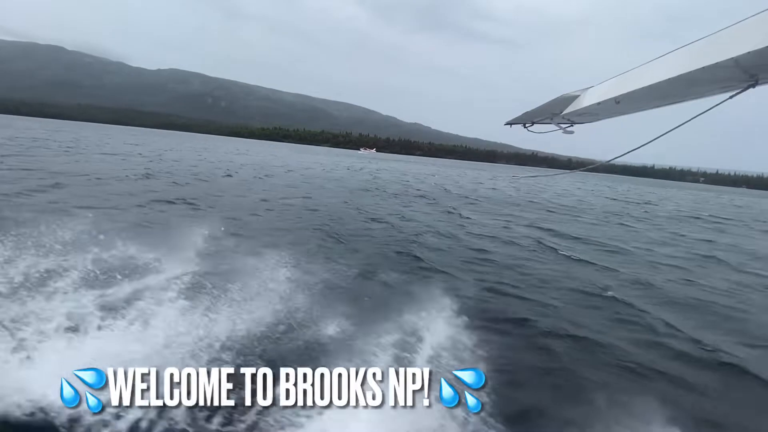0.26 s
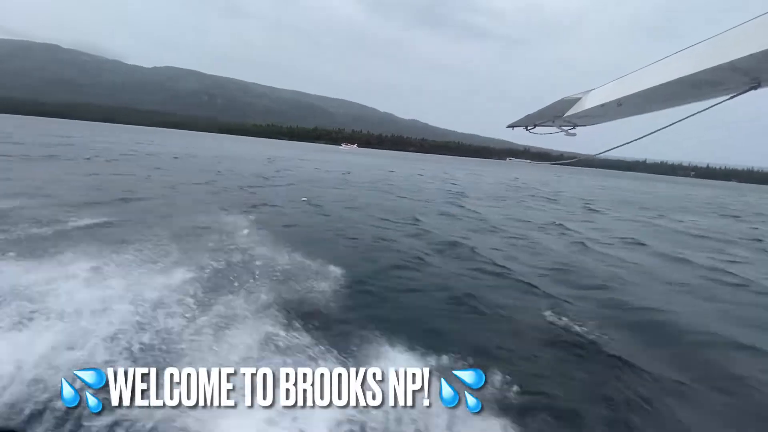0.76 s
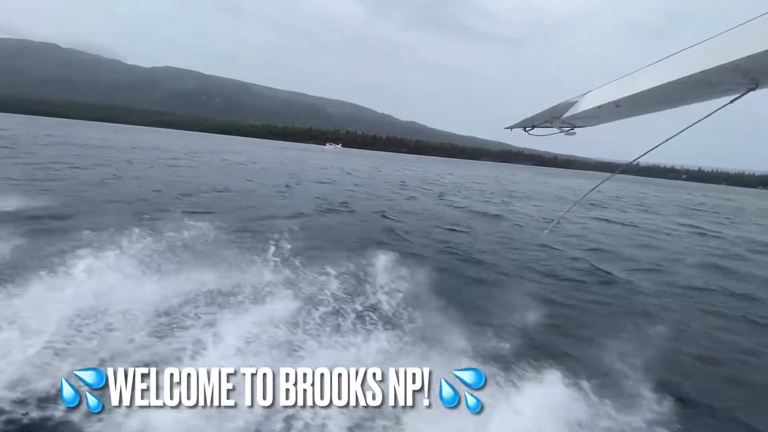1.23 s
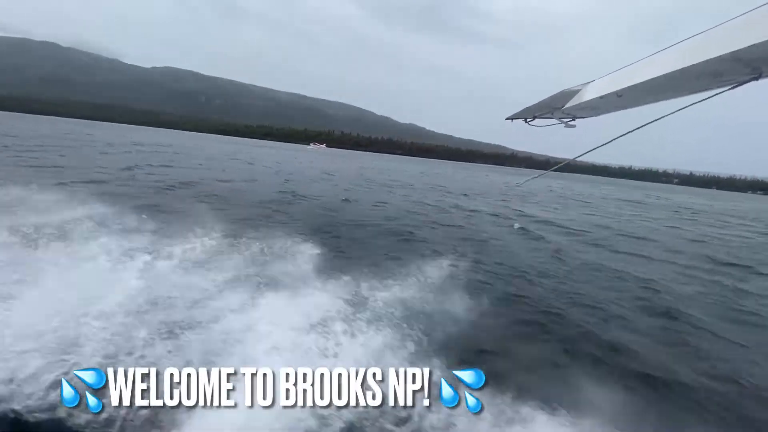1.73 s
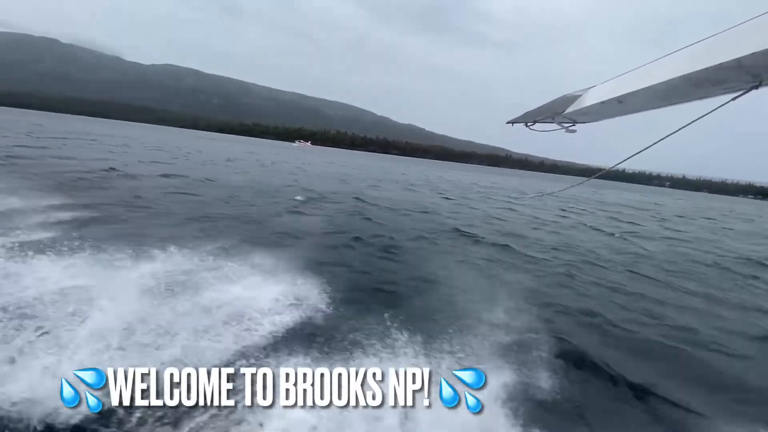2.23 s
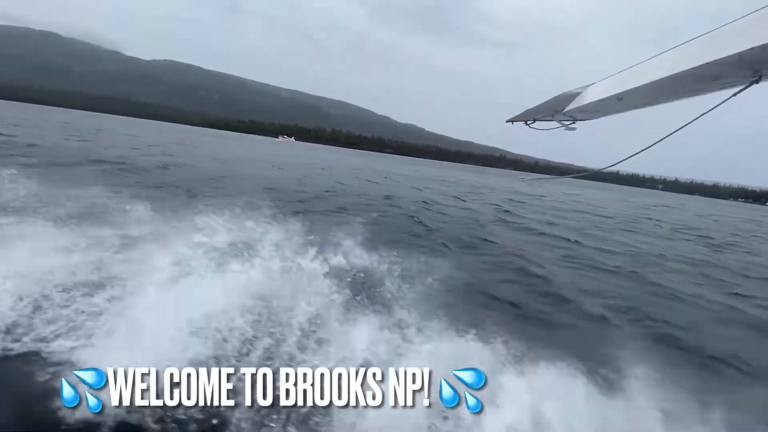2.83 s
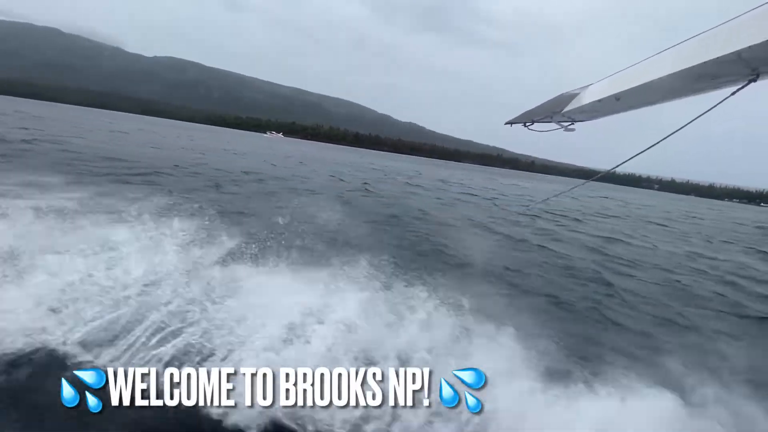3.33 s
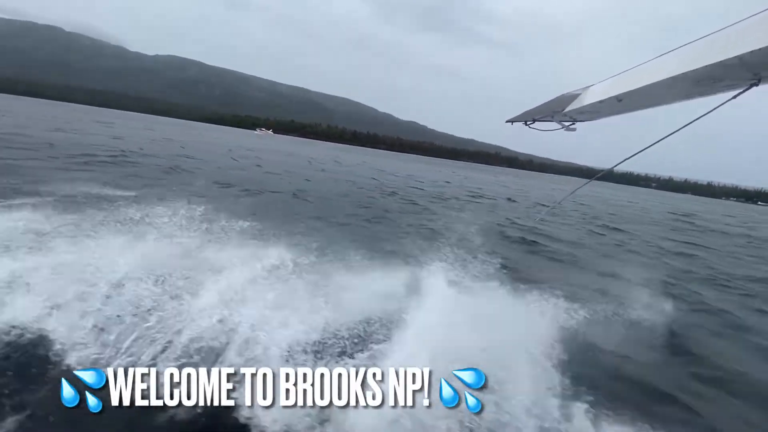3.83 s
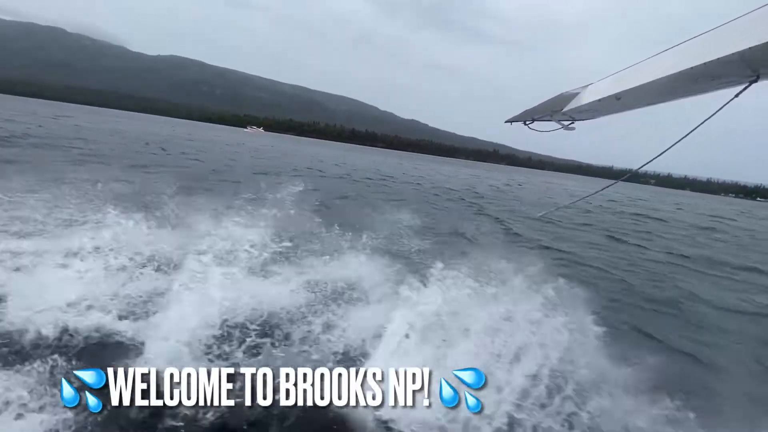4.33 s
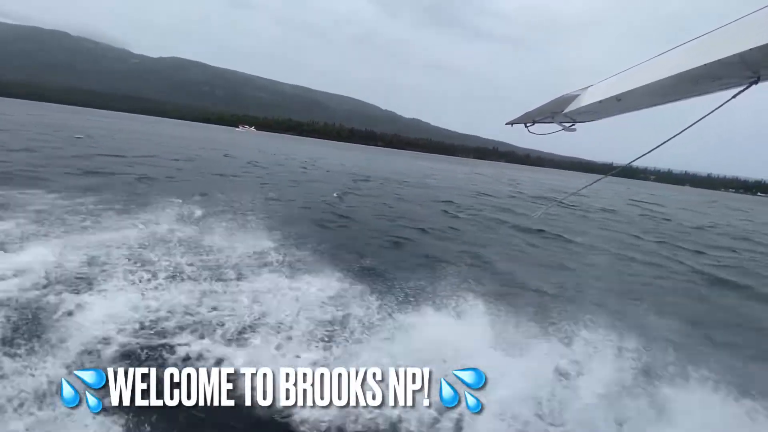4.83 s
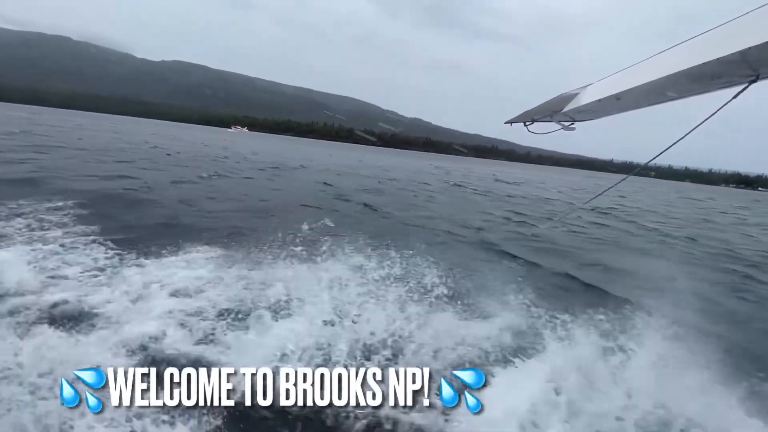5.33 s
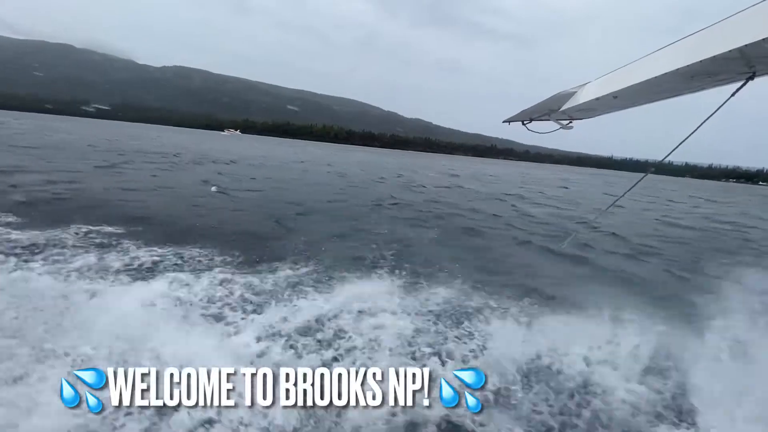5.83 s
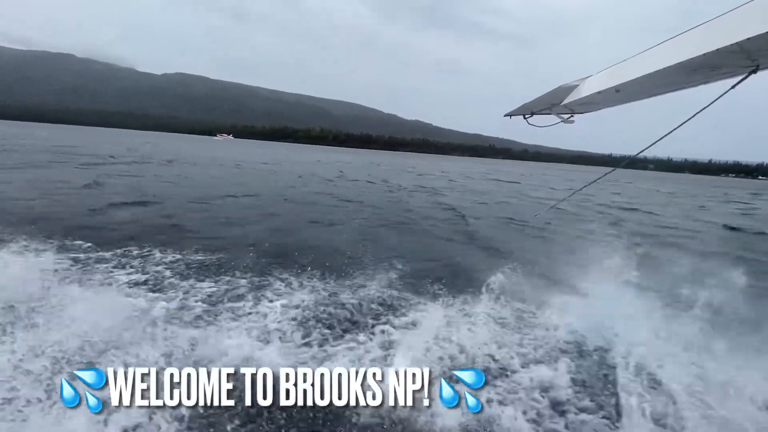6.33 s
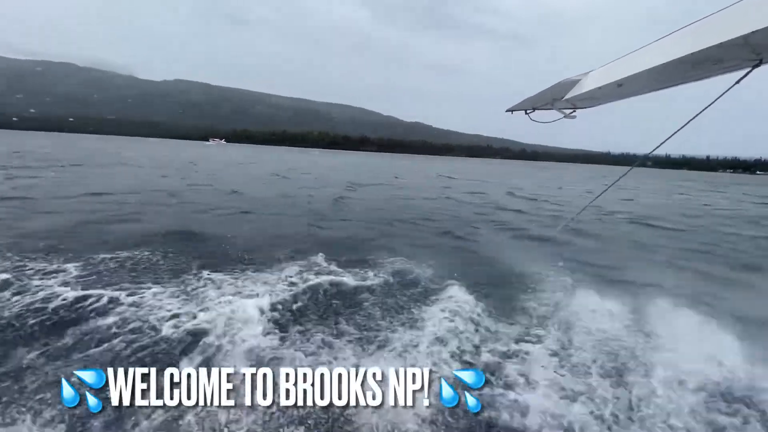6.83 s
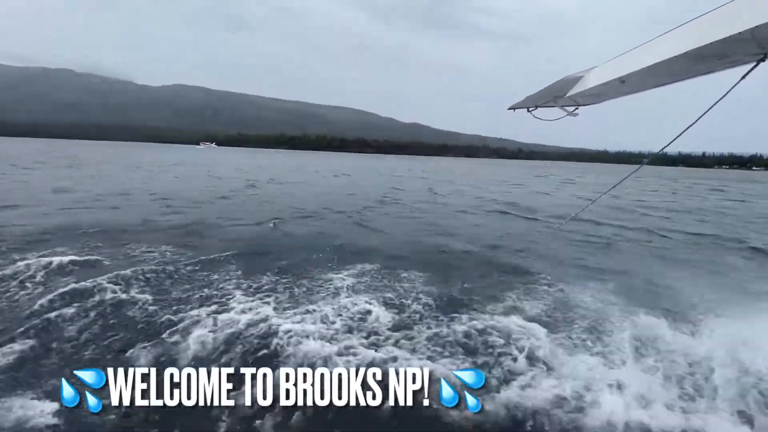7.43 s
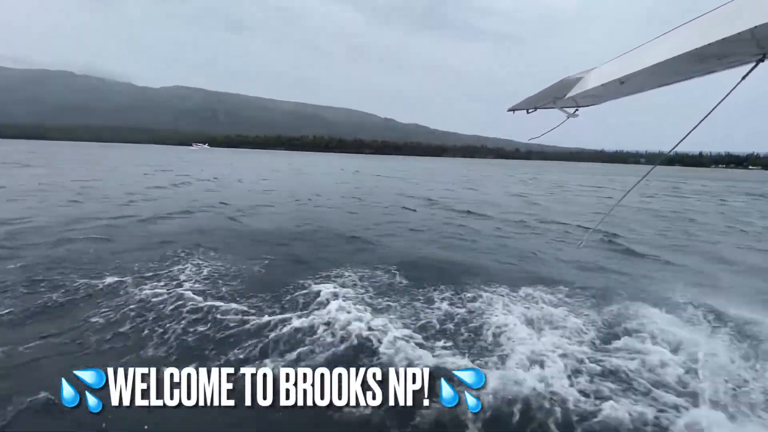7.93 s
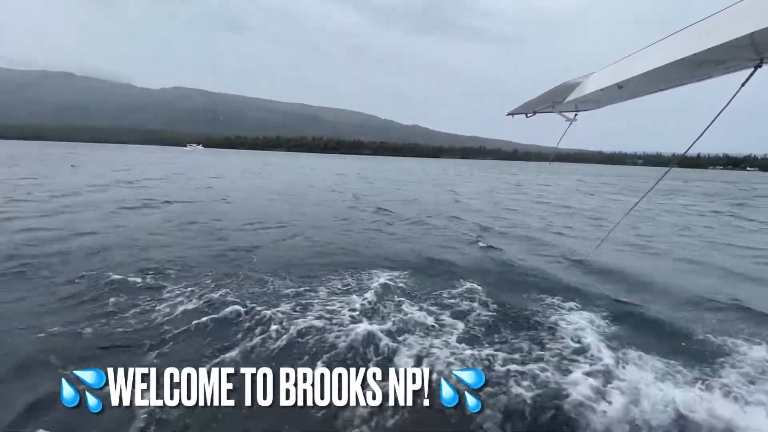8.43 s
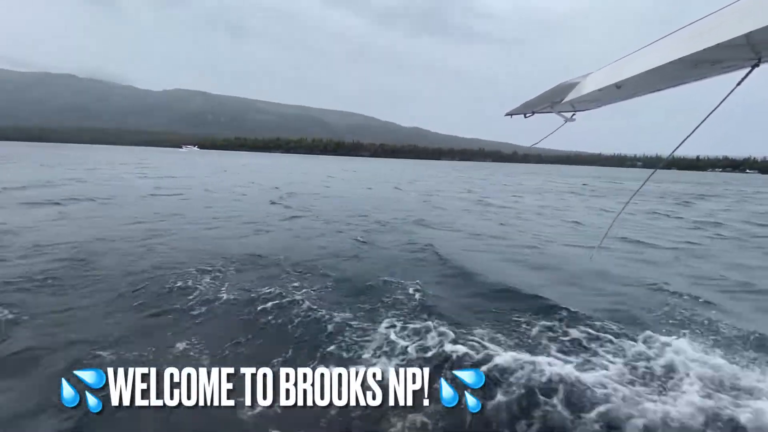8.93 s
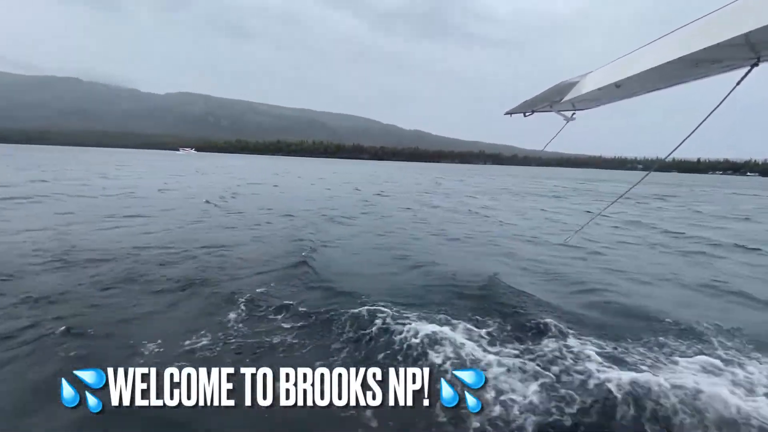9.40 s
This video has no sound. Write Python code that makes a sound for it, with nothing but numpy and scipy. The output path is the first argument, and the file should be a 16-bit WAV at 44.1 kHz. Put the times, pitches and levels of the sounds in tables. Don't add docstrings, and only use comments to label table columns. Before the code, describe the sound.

Inside a floatplane slowing on a lake: low water drumming, thuds on the floats, spray bursts, small squeaks, then engine power swelling back.

```python
import sys
import numpy as np
from scipy import signal
from scipy.fft import rfft, irfft
from scipy.io import wavfile
from scipy.ndimage import uniform_filter1d

SR = 44100
rng = np.random.default_rng(int(sys.argv[2]) if len(sys.argv) > 2 else 0)


def field_ratio(decibels):
    return 10 ** (np.asarray(decibels, dtype=float) / 20)


def unload_audio(sound):
    columns = np.transpose(np.atleast_2d(sound))
    steps = np.round(np.clip(columns, -1, 1) * 32767)
    wavfile.write(sys.argv[1], SR, steps.astype(np.int16))


N = 426006


def unit(x):
    return x / np.sqrt(np.mean(x ** 2) + 1e-20)


def in_time(rows):
    s, *columns = np.transpose(rows)
    return [np.interp(np.arange(N) / SR, s, c) for c in columns]


def at_hz(points, hz):
    axis, *columns = np.transpose(points)
    return [np.interp(np.log(hz), np.log(axis), c) for c in columns]


def drift(rate):
    r = np.exp(-80 * np.pi * rate / SR)
    chance = rng.standard_normal(N // 40 + 2002)
    slow = signal.lfilter([1], [1, -2 * r, r * r], chance)[2000:]
    return np.interp(np.arange(N) / 40, np.arange(len(slow)), unit(slow))


def resonate(x, hz, width_hz):
    r = np.exp(-np.pi * width_hz / SR)
    zeros = np.array([1, 0, -1]) * (1 - r * r) / 2
    return signal.lfilter(zeros, [1, -2 * r * np.cos(2 * np.pi * hz / SR), r * r], x)


def lean(db):
    return field_ratio(np.array([[db / 2], [-db / 2]]))


def banded_noise(spectrum, shared_db, own_db, rate):
    # f/Hz, likeness/0-1, right leads/rad, left over right/dB
    likeness = [(50, 0.96, 0, 0.5), (115, 0.96, -0.17, 2), (203, 0.97, 0.72, 1), (297, 0.59, -0.16, 7),
                (380, 0.56, 1.94, -3), (460, 0.31, 2, -1.5), (717, 0.67, 3.5, -2.5), (960, 0.32, 4, -3),
                (1267, 0.89, 5, -10), (1834, 0.38, 1.5, -8), (2360, 0.3, -1.7, 0.5), (3860, 0.39, 4.5, -2),
                (6040, 0.37, 4.5, -10), (9300, 0, 4.5, 4.5), (11300, 1, 0.5, 1)]
    lowest, highest = spectrum[0][0], spectrum[-1][0]
    edges = np.geomspace(lowest, highest, round(4 * np.log2(highest / lowest)) + 1)
    together, out = drift(rate), 0
    white = rng.standard_normal((2, 3, N))
    white[:, 1] = irfft(1j * rfft(white[:, 0]), N)
    for k, (low, high) in enumerate(zip(edges, edges[1:])):
        middle = np.sqrt(low * high)
        band = signal.butter(2, [low, high], "band", fs=SR, output="sos")
        left, ahead, other = signal.sosfilt(band, white[k % 2])
        alike, lead, lean_db = at_hz(likeness, middle)
        alike = np.clip(alike, 0, 1)
        turned = np.cos(lead) * left + np.sin(lead) * ahead
        right = alike * turned + np.sqrt(1 - alike ** 2) * other
        level_db = at_hz(spectrum, middle)[0]
        gain = field_ratio(level_db + shared_db * together + own_db * drift(2 * rate))
        out = out + gain * lean(lean_db) * [left, right]
    return out / np.sqrt(np.mean(out.mean(axis=0) ** 2))


def blade_note(rows, waver_db, orders=()):
    hz, level_db = in_time(rows)
    t = np.arange(N) / SR
    first, last = rows[0][0], rows[-1][0]
    fade = np.clip((t - first) / 0.17 + 1, 0, 1) * np.clip((last - t) / 0.095 + 3.5, 0, 1)
    turn = 2 * np.pi * np.cumsum(hz) / SR
    note = np.sin(turn) * field_ratio(waver_db * drift(17.4))
    settled = np.clip((t - first - .75) / 0.41, 0, 1)
    for multiple, db in orders:
        strength = settled * field_ratio(db + 3.6 * drift(2.1))
        note += strength * np.sin(multiple * turn + 1.24 * drift(2.5))
    return np.sqrt(2) * fade * field_ratio(level_db) * note


def coasting():
    start_hz, rest_hz, sag_s = 81, 15, 3.3
    hunt_s, hunt_hz, hunt_period_s = 6.68, 2.0, .85
    blade_db, loss_db_per_s = -16.5, 1.0
    dies_s, dies_db_per_s = 2.77, 11.5
    octave_from_s, octave_db, octave_gain_db_per_s = 4.3, -21.5, 2.5
    octave_to_s = 7.05
    s = np.linspace(0, octave_to_s, num=72)
    hunt = (s - hunt_s) / hunt_period_s
    hz = rest_hz + (start_hz - rest_hz) * np.exp(-s / sag_s)
    hz = hz + hunt_hz * np.sin(2 * np.pi * hunt) * (abs(hunt) < .5)
    db = blade_db - loss_db_per_s * s - dies_db_per_s * np.maximum(s - dies_s, 0)
    note = np.transpose([s, hz, db])
    octave = np.transpose([s, 2 * hz, octave_db + octave_gain_db_per_s * (s - octave_from_s)])
    return blade_note(note, waver_db=-1.3) + blade_note(octave[s >= octave_from_s], waver_db=1.0)


def power_return():
    # t/s, f/Hz, level/dB
    climb = [
        (7.42, 36.3, -32),
        (7.47, 38.03, -9.5),
        (7.69, 49.2, -7.5),
        (7.76, 55.15, -8),
        (7.99, 63, -6),
        (8.24, 67.5, -6.5),
        (8.5, 69.74, -8),
        (9.08, 65.45, -9),
        (9.6, 64.7, -8.5),
    ]
    # multiple of blade rate, level/dB
    linked_tones = [(.76, -9), (.89, -12), (1.78, -12.5), (2.35, -25), (3.85, -18)]
    return blade_note(climb, waver_db=1.0, orders=linked_tones)


def cabin_boom(throb):
    # f/Hz, level/dB per Hz
    air_spectrum = [(170, -8), (210, -5), (250, -5), (305, -3), (350, -5), (410, -3.5), (470, -9),
                    (560, -15), (700, -10)]
    # f/Hz, width/Hz, level/dB
    standing = [(157.3, 14.7, -1.5), (210, 16.6, -2.5), (253, 20, -7), (300.3, 23.5, -2), (348.4, 19, -5),
                (414.2, 49, -7.5)]
    broad = banded_noise(air_spectrum, shared_db=1.77, own_db=3.5, rate=9.8)
    white = rng.standard_normal((2, N))
    white[1] = 0.48 * white[0] + 0.83 * white[1]
    modes = 0
    for hz, width, db in standing:
        ring = resonate(resonate(white, hz, width), hz, width)
        modes = modes + field_ratio(db) * ring / np.sqrt(width)
    return (broad + field_ratio(0.7) * unit(modes) * lean(3.6)) * (1 + 0.2 * throb)


def evened(x, share, seconds):
    swell = uniform_filter1d(np.mean(x ** 2, axis=0), round(seconds * SR)) + 1e-6
    return x * swell ** (-share / 2)


def water_drumming():
    # f/Hz, level/dB per Hz
    float_spectrum = [(32, -32), (40, 2), (55, 3), (90, 1), (110, -3.5), (130, -6), (160, -3.5),
                      (178, -5.5), (200, -11.5), (250, -17)]
    rush = banded_noise(float_spectrum, shared_db=1.06, own_db=0.84, rate=5.3)
    return evened(rush, share=1.0, seconds=0.13)


def slaps():
    # t/s, peak/dB, t60/s,
    # wash/dB, upper modes/dB
    waves = [(0.029, -11, 0.25, -29, 3), (0.425, -1.5, 0.26, -30, 0), (1.454, -12, 0.32, -41, -3),
             (1.484, -1, 0.16, -24, -1), (1.859, -5.5, 0.45, -31, 0.5), (2.35, -5, 0.14, -32, 0.5),
             (2.498, -7, 0.29, -43, 5), (3.557, -3.5, 0.23, -33, 1), (4.065, -12, 0.35, -33, -1),
             (4.194, -6, 0.15, -45, 0), (4.68, -16, 0.23, -26, 5), (5.13, -10, 0.35, -42, 3.5),
             (5.607, -10.5, 0.42, -36, 7), (5.73, -12, 0.47, -34, 7.5), (5.945, -9.5, 0.25, -35, 5),
             (7.029, -9, 0.22, -29, -4), (7.34, -5, 0.54, -28, -0.5), (7.47, -11.5, 0.55, -34, 6.5)]
    # f/Hz, level/dB
    shell_modes = [(70, 4), (88, -5.5), (150, -1), (172, -7), (310, -9.5)]
    upper_from_hz = 100
    out, t = np.zeros((2, N + SR)), np.arange(SR // 2) / SR
    white = rng.standard_normal((2, N + SR))
    wash = resonate(white, 580, 400) + 0.44 * resonate(white, 980, 620)
    wash = unit(resonate(wash, 780, 1800))
    chances = rng.standard_normal((len(waves), len(shell_modes)))
    for (s, db, t60, wash_db, upper_db), chance in zip(waves, chances):
        span = slice(round(s * SR), round(s * SR) + len(t))
        shell = 0
        for (hz, mode_db), c in zip(shell_modes, chance):
            strength = field_ratio(mode_db + 1.5 * c + upper_db * (hz > upper_from_hz))
            shell = shell + strength * np.sin(2 * np.pi * hz * t)
        out[:, span] += field_ratio(db - 8.0 - 60 * t / t60) * shell
        out[:, span] += field_ratio(wash_db - 6.0 - 60 * t / 1.1) * wash[:, span]
    return out[:, :N]


def splashes():
    # t/s, peak/dB, body/dB
    sheets = [(0.1166, -30.5, 1), (0.6744, -44, 6), (1.363, -30, -2), (1.5399, -36.5, -11),
              (1.8796, -37, -6), (2.073, -24, -1), (2.2143, -28.5, -1), (2.238, -34.5, 3), (2.6798, -45, 4),
              (3.1782, -35, -7), (4.0617, -38, -10), (4.1999, -35, -3), (4.6269, -42, 2), (4.9711, -40, 2),
              (5.1339, -33, -14), (5.3093, -37, -12), (5.5288, -35, -10), (5.5593, -36, 5),
              (5.9588, -38, 3), (6.4173, -40, 2), (6.791, -39, 3), (7.1152, -35, 4), (7.3591, -33.5, 4),
              (7.5994, -32.5, -4), (7.9067, -38, 1), (8.0401, -32, -14), (8.2797, -35, 0), (8.505, -35, 1),
              (8.7977, -32, 1), (9.2693, -35, -15)]
    # f/Hz, width/Hz, level/dB
    skin_modes = [(3470, 1600, 5), (4560, 830, 7.5), (5660, 550, 3.5), (6700, 550, 8), (8800, 1600, -16)]
    t60, body_lasts = 0.064, 1.65
    right_db, pan_per_db = -8.5, 1.1
    spits, spit_db, spits_from_s = 12, -42, 3.9
    out = np.zeros((2, N))
    white = rng.standard_normal((2, N)) * field_ratio(2.2 * drift(260))
    skin = unit(sum(field_ratio(db) * resonate(white, hz, width) for hz, width, db in skin_modes))
    skin = signal.sosfilt(signal.butter(2, 8000, fs=SR, output="sos"), skin)
    body = resonate(white, 1550, 1100) + 0.44 * resonate(white, 2000, 1160)
    body = unit(resonate(body, 1600, 3300))
    t = np.arange(SR // 3) / SR
    spacing = (N / SR - .5 - spits_from_s) / spits
    strays = [(spits_from_s + (k + when) * spacing, spit_db + 2 * big, 6 * dull)
              for k, (when, big, dull) in enumerate(rng.random((spits, 3)))]
    for s, db, body_db in list(sheets) + strays:
        pan_db = min(right_db + pan_per_db * (db + 34), 0)
        size = field_ratio(0.48 * (db + 41.5))
        start = round((s - 0.0016 * size) * SR)
        span = slice(start, start + len(t))
        quick, slow = (field_ratio(-60 * t / d) + field_ratio(-23.5 - 22 * t / d)
                       for d in (t60 * size, t60 * size * body_lasts))
        build_up = field_ratio(db - 4.5) * (1 - np.exp(-t / (.001 * size)))
        water = quick * skin[:, span] + field_ratio(body_db + 0.2) * slow * body[:, span]
        out[:, span] += lean(pan_db) * build_up * water
    return out


def squeaks():
    # first slip t/s, last slip t/s, first level/dB, last level/dB
    bouts = [(.012, .035, -41, -55), (.101, .193, -34.5, -37.5), (.29, .376, -47, -45),
             (0.428, .471, -36.5, -43), (.592, .631, -43, -47), (.857, .986, -43, -49),
             (1.33, 1.33, -48, -52), (1.405, 1.444, -44, -48), (1.513, 1.559, -57, -45),
             (1.669, 1.757, -49, -53), (1.811, 1.811, -42, -43), (1.917, 1.965, -38, -48),
             (2.244, 2.3, -43, -42), (2.341, 2.42, -44, -44), (2.528, 2.672, -45, -43.5),
             (2.72, 2.758, -47, -57), (2.867, 2.867, -44.5, -40), (3.343, 3.427, -46, -46.5),
             (3.589, 3.634, -44, -42), (3.724, 3.764, -44, -44), (4.558, 4.558, -51, -53),
             (4.69, 4.724, -54, -49), (5.159, 5.2, -42, -45), (5.591, 5.591, -44, -42),
             (5.988, 5.988, -42.5, -41)]
    # t/s, f/Hz
    pitch = [(0, 4165), (3.8, 4180), (4.5, 4120), (6, 4110)]
    # t/s, octave over tone/dB
    grip = [(0, -14), (.7, -11), (1.5, -6), (2.4, -6.5), (2.7, -3), (3.6, -0.5), (4.7, -4), (6, -7)]
    slip_every_s, slip_s, flutter_db = .045, 0.025, 1.9
    slips = [row for a, b, db_a, db_b in bouts
             for row in np.linspace([a, db_a], [b, db_b], round((b - a) / slip_every_s) + 1)]
    low, high, bend = np.zeros(N), np.zeros(N), np.zeros(N)
    for (s, db), (slide, longer, shrill) in zip(slips, rng.standard_normal((len(slips), 3))):
        i = round((s - .006) * SR)
        n = round(1.1 * slip_s * field_ratio(2.2 * longer) * SR)
        along = np.arange(n) / n
        low[i:i + n] += field_ratio(db - 3.0) * np.sin(np.pi * along ** 0.56)
        high[i - 150:i - 150 + n] += field_ratio(db + 2.5 + 0.94 * shrill) * np.sin(np.pi * along ** 0.35)
        bend[i:i + n] = .015 * slide * (along - .5)
    hz = in_time(pitch)[0] * (1 + bend + 0.0035 * drift(40))
    turn = 2 * np.pi * np.cumsum(hz) / SR
    tone = low * field_ratio(flutter_db * drift(90)) * np.sin(turn)
    octave = high * field_ratio(in_time(grip)[0] + flutter_db * drift(90)) * np.sin(2 * turn)
    return tone * lean(-12.0) + octave * lean(1.5)


def ticks():
    # t/s, peak/dB, f/kHz
    drops = [(0.115, -38, 11), (0.2996, -42, 15), (0.6, -31, 11.4), (1.362, -33, 13.3), (2.0692, -44, 11),
             (2.2118, -44, 11), (3.1777, -50, 12.5), (6.501, -37, 8), (7.078, -40, 5.5), (8.043, -40, 7.3),
             (8.868, -42, 5.5)]
    out, t = np.zeros(N), np.arange(SR // 20) / SR
    for (s, db, khz), fizz in zip(drops, rng.standard_normal((len(drops), len(t)))):
        bright = resonate(resonate(fizz, 1000 * khz, 6000), 1000 * khz, 6000)
        snap = unit(bright) * (field_ratio(-60 * t / 0.0071) + field_ratio(-23 - 60 * t / 0.044))
        start = round(s * SR)
        out[start:start + len(t)] += field_ratio(db + 4) * snap
    return out


def airflow_roar():
    # f/Hz, level/dB per Hz
    wall_spectrum = [(450, -3.5), (600, -1), (800, -1.5), (1000, -6), (1220, -1.5), (1400, -4), (1600, -7),
                     (1900, -10.5), (2050, -11), (2200, -17.5), (2600, -25.5), (3400, -20.5)]
    return banded_noise(wall_spectrum, shared_db=0.76, own_db=1.23, rate=12.0)


def spray_hiss():
    # f/Hz, level/dB per Hz
    spray_spectrum = [(2300, 5), (3000, -7.5), (3700, -4), (4630, -2.5), (5800, -9.5), (7200, -7),
                      (8000, -15), (10000, -13)]
    # f/Hz, width/Hz, level/dB
    panels = [(5820, 160, -16), (7040, 200, -17)]
    hiss = banded_noise(spray_spectrum, shared_db=0.5, own_db=1.5, rate=15)
    white = rng.standard_normal((2, N))
    rings = sum(field_ratio(db + 2.3 * drift(3)) * unit(resonate(white, hz, width)) for hz, width, db in panels)
    return hiss + rings * lean(-11)


def air_leak():
    # f/Hz, level/dB per Hz
    leak_spectrum = [(8000, -4), (9000, -0.5), (10300, -2.5), (12000, 8), (13200, -1.5), (13700, -4),
                     (14300, -12)]
    return banded_noise(leak_spectrum, shared_db=0.0, own_db=1.0, rate=9.8)


def scene():
    # t/s, airflow and engine load/dB, pounding of the water/dB
    forces = [(0.0, -32.5, -5), (0.05, -36, -15), (1.26, -37, -19), (1.48, -36, -15), (2.55, -36, -19),
              (2.66, -37, -20), (3.52, -37, -20), (3.58, -31.5, -12), (3.79, -37, -17.5), (4.49, -34, -21),
              (4.57, -33.5, -18.5), (5.6, -33, -20.5), (5.62, -33, -16.5), (5.92, -33, -21.5),
              (6.99, -32.5, -22.5), (7.8, -27.5, -18), (9.55, -32, -18), (9.66, -31.5, -15.5)]
    # t/s, level/dB
    leak_levels = [(0.04, -56.5), (1.64, -57.5), (4.15, -55.5), (5.29, -51), (7.32, -50), (7.7, -44),
                   (8.58, -53.5), (9.62, -53)]
    load_db, pound_db = (db - db.mean() for db in in_time(forces))
    air_db, = in_time(leak_levels)
    wind_db = air_db - air_db.mean()
    on = np.clip((np.arange(N) / SR - 7.08) / 0.33, 0, 1)
    power = power_return()
    drum_db = -15.5 + 0.95 * pound_db - 0.5 * on
    boom_db = -28 + 0.82 * pound_db + 0.48 * load_db + 3.5 * on
    roar_db = -32 + load_db
    spray_db = -48.5 + 0.67 * load_db + 0.36 * pound_db + .3 * wind_db
    engine = (coasting() + power) * lean(1.8)
    boom = field_ratio(boom_db) * cabin_boom(power)
    drumming = field_ratio(drum_db) * water_drumming()
    water = slaps() * lean(1.8) + drumming + splashes() + ticks() + field_ratio(spray_db) * spray_hiss()
    air = field_ratio(roar_db) * airflow_roar() + field_ratio(air_db - 1.8) * air_leak()
    return engine + boom + water + squeaks() + air


def top_cut(x):
    return signal.sosfilt(signal.butter(12, 14340, fs=SR, output="sos"), x)


def record(dry):
    x = signal.sosfilt(signal.butter(4, 32, "high", fs=SR, output="sos"), dry)
    limited = np.tanh(x / 0.99)
    mix = signal.sosfilt(signal.cheby2(16, 45, 15800, fs=SR, output="sos"), limited)
    return top_cut(mix)


dry = scene()
out = record(dry)
unload_audio(out)
```